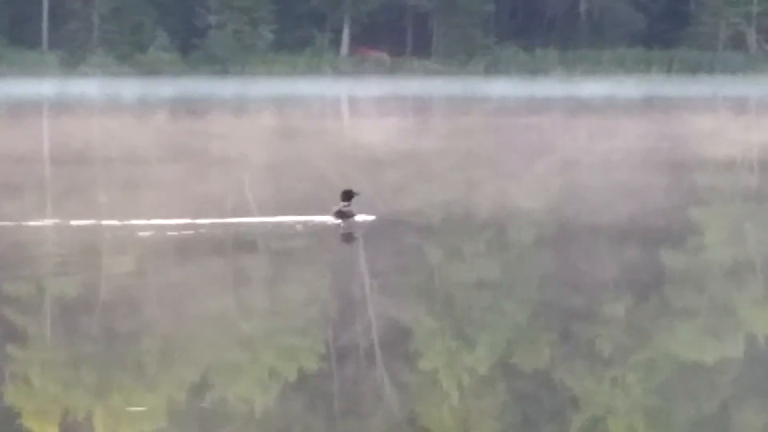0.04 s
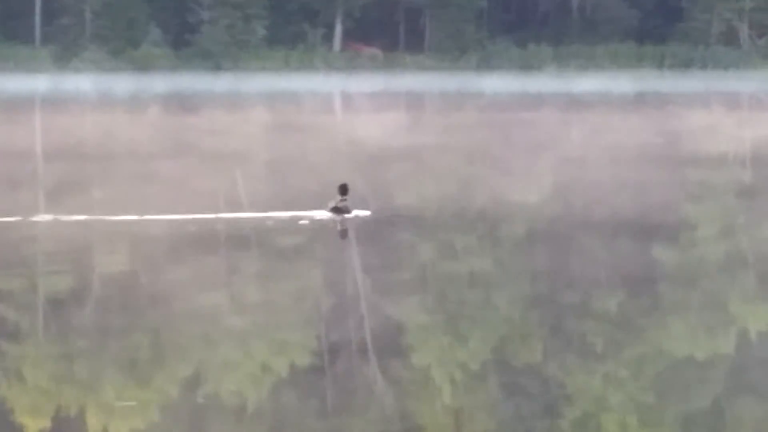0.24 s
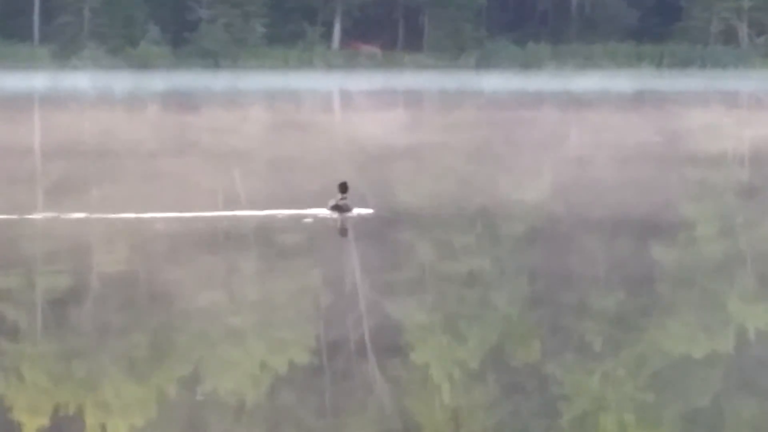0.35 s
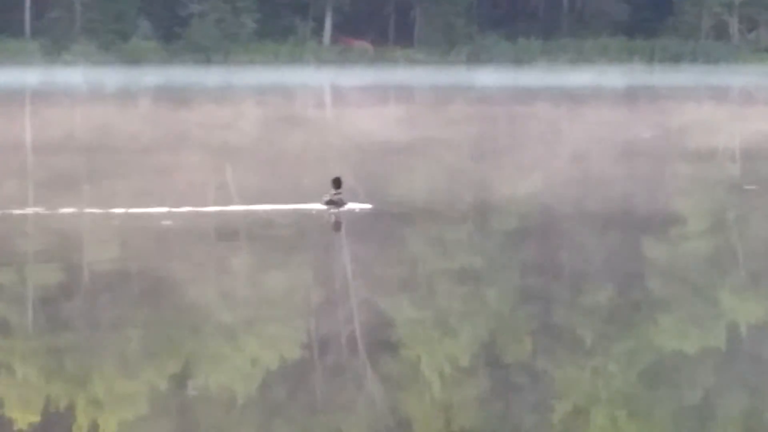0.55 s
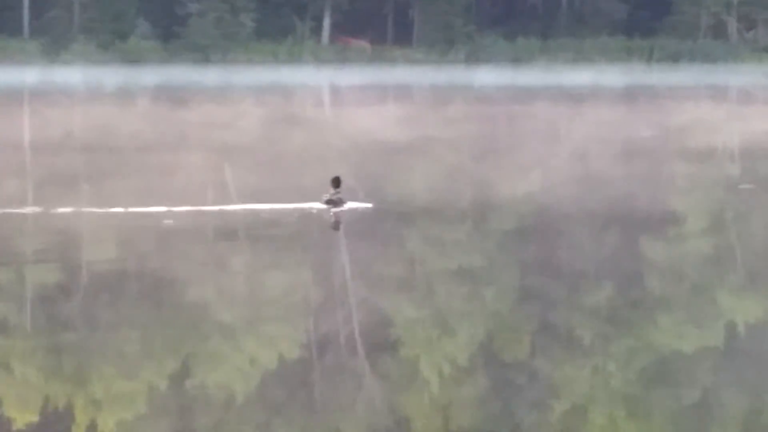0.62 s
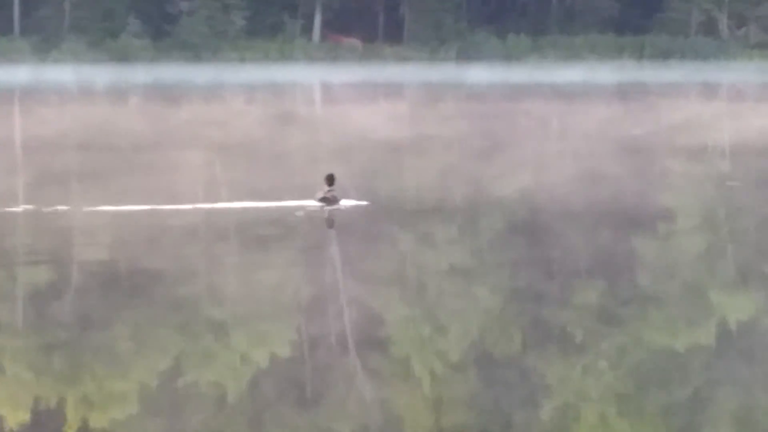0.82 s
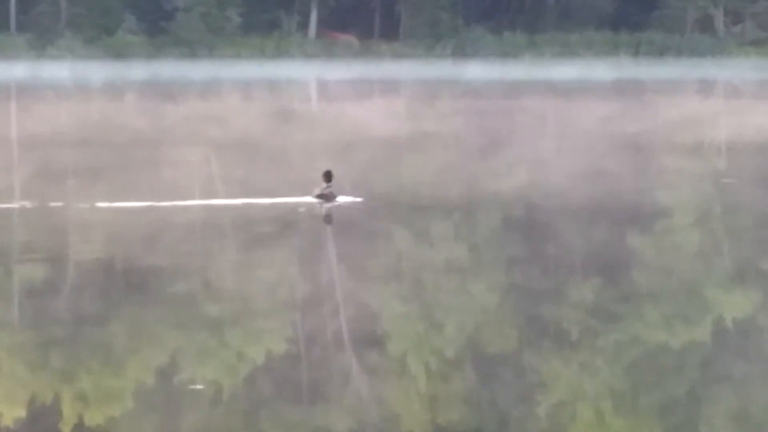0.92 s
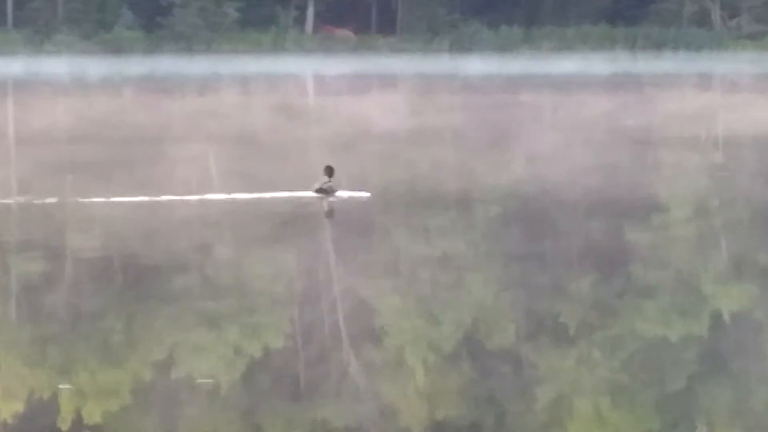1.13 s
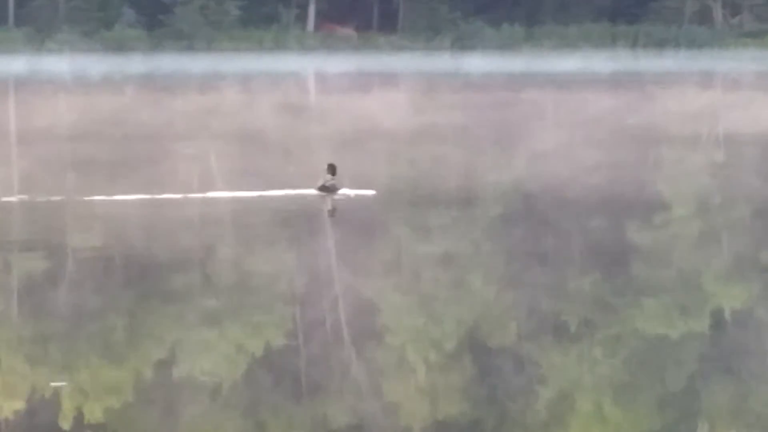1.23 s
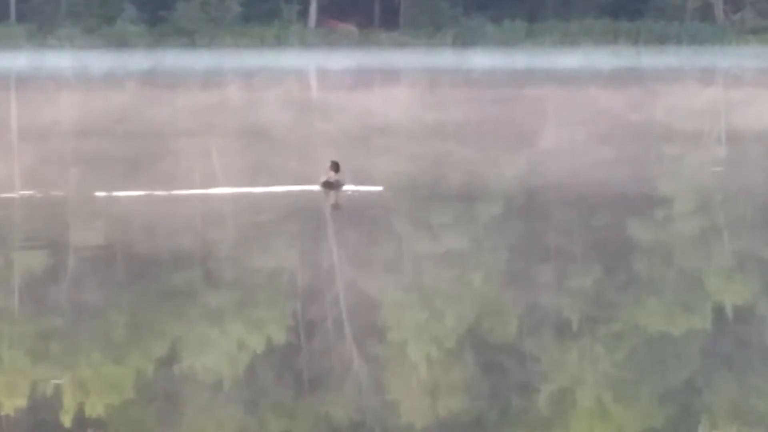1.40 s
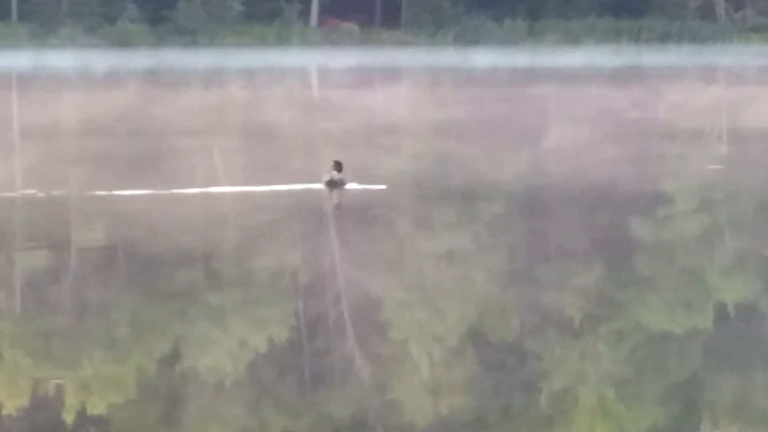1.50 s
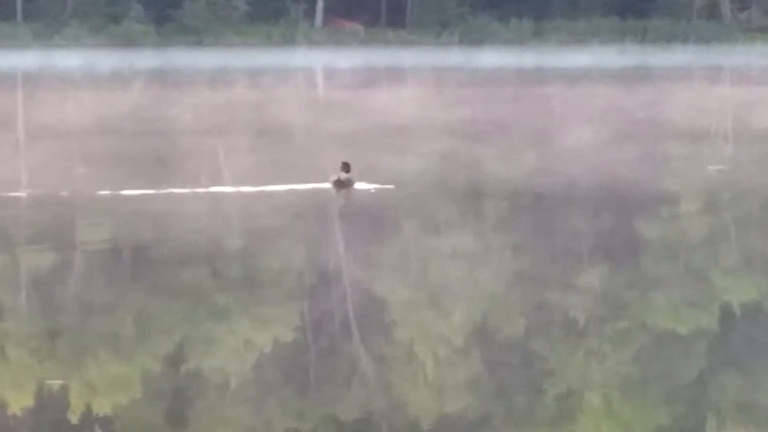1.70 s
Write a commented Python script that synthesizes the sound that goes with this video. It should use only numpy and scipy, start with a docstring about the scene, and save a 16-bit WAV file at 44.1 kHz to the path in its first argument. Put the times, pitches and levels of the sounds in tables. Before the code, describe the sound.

A loon gives one long wailing call across a calm lake, with faint echoes.

```python
"""A soft, rising yelp opens the single call of a loon, far out on a calm lake.
The bird's voice breaks upward into a clear note, jumps again to a long, sinking wail
and drops to a short, low hoot as its breath runs out. The wooded shore rings with the call
and sends late echoes back over a faint outdoor hush and a low rumble of air.
A high hiss flickers, and a soft noise follows the loudness of the call."""
import sys
import numpy as np
from scipy import signal
from scipy.fft import rfft, irfft
from scipy.io import wavfile
from scipy.ndimage import uniform_filter1d

SR = 44100
rng = np.random.default_rng(int(sys.argv[2]) if len(sys.argv) > 2 else 0)


def unload_wav(signal):
    """Save mono or channel-first audio to the path in sys.argv[1] as 16-bit WAV at rate SR, clipped to [-1, 1]."""
    wavfile.write(
        sys.argv[1],
        SR,
        np.round(np.clip(np.atleast_2d(signal).T, -1, 1) * 32767).astype(np.int16),
    )


N = 77175

# The four notes of the call (time [s], pitch [Hz], level [dB]); the yelp's level is reshaped later.
YELP_PATH = [(0.152, 452, -48), (.172, 514.7, -40.5), (0.201, 554, -35), (0.228, 636, -42)]
CLEAR_PATH = [(.231, 797.5, -28.5), (.26, 811, -24.5), (.32, 827, -25), (.342, 846.4, -19),
              (.356, 833, -20.5), (.374, 849.6, -16), (.389, 855.7, -19.5), (.407, 893, -22)]
WAIL_PATH = [(.411, 1049, -22), (.49, 1047, -21.5), (.55, 1043, -21), (.605, 1041, -25.5),
             (.66, 1038, -24.5), (.70, 1037, -19), (.735, 1034, -17.3), (.778, 1029, -22.7),
             (.822, 1028, -17.6), (.85, 1020, -27), (.895, 1021, -21.3), (.935, 1017, -21.3),
             (.958, 1012, -25.5), (.985, 1010, -22.3), (1.06, 1000, -29.5), (1.16, 989, -30.5),
             (1.3, 964, -34), (1.39, 954, -36), (1.438, 943, -38)]
HOOT_PATH = [(1.441, 738, -44), (1.453, 726.5, -32.5), (1.479, 713, -51.5)]
# Tones stacked in a note, called harmonics (multiple of the pitch, base level within the note [dB])
YELP_HARMONICS = [(1, 8), (2, 0), (3, -6.5)]
CLEAR_HARMONICS = [(2, -24.5), (3, -50.5), (4, -42.5), (5, -51.5), (6, -54), (7, -56), (11, -67.5)]
# The wail's harmonics against its lowest tone (multiple, start [dB], end [dB], time to settle [s])
WAIL_HARMONICS = [(2, -37, -45, 0.71), (3, -46.5, -34, 0.73), (4, -54.5, -52, .5), (5, -43.5, -58.5, 0.3),
                  (9, -56, -71.5, 0.36), (10, -57, -67, .5)]
# Echoes from the shore (delay [s], fade time [s], level before dulling [dB])
SHORE_ECHOES = [(.84, .16, -28), (1.36, .15, -33)]
# Tone colour of each background noise (frequency [Hz], relative level [dB])
HUSH_COLOUR = [(25, -10), (60, -5), (170, -4.5), (400, -6), (1000, -6), (2000, -7.5), (4000, -10.5),
               (6300, -16), (8000, -24), (12000, -26.5), (16000, -27.5)]
FOLLOWING_COLOUR = [(30, -17.5), (200, -12.5), (700, -3.5), (1400, -8), (2800, -11), (5000, -23),
                    (9000, -43.5), (16000, -40)]
RUMBLE_COLOUR = [(25, -16.5), (50, -8), (110, 1.5), (220, 1.5), (400, -2.5), (700, -6), (1500, -23),
                 (4000, -46.5)]
# How the rumble swells and fades (time [s], level [dB])
RUMBLE_SWELL = [(.12, -70), (.2, -63), (.45, -59), (.62, -66.5), (.72, -56.5), (.84, -56), (1.03, -58.5),
                (1.11, -66.5), (1.36, -68), (1.7, -72)]

BREAK_S, SOFT_BREAK_S = 0.0073, 0.019  # time to change notes; the last change is softer
THROAT_HZ, THROAT_WIDTH_HZ = 990, 100
NEAR_RING_S, FAR_RING_S = 0.5, 1.9  # time to fade by 60 dB
HUSH_DB, FOLLOWING_DB = -61.5, -37.5  # the following noise is relative to the voice
TIME = np.arange(N) / SR


def yelp():
    """The husky opening slide: its second harmonic sweeps through the pitch where the throat rings."""
    pitch, phase, volume = note(YELP_PATH, BREAK_S, BREAK_S)
    phase += 0.091 * wobble(500)  # a fast shake sounds husky
    firming_db = np.interp(TIME, [YELP_PATH[0][0], YELP_PATH[-1][0]], [0, 14])
    tone = np.zeros(N)
    for multiple, db in YELP_HARMONICS:
        hz = multiple * pitch
        throat = 1 / np.hypot(1, (hz / THROAT_HZ - THROAT_HZ / hz) * THROAT_HZ / THROAT_WIDTH_HZ)
        strength = gain(db + (multiple == 1) * firming_db)  # only the lowest tone firms up
        tone += strength * throat * np.sin(multiple * phase)
    return volume * tone


def clear_note():
    """The voice breaks into a rising note that grows purer as it swells."""
    _, phase, volume = note(CLEAR_PATH, BREAK_S, BREAK_S)
    upper_volume = volume.max() * (volume / volume.max()) ** 0.87  # swells less than the lowest tone
    upper = sum(harmonic(phase, multiple, db) for multiple, db in CLEAR_HARMONICS)
    return volume * np.sin(phase) + upper_volume * upper


def wail():
    """The long, sinking top note: its third harmonic grows while most others fade."""
    _, phase, volume = note(WAIL_PATH, BREAK_S, SOFT_BREAK_S)
    age = TIME - WAIL_PATH[0][0]
    tone = np.sin(phase)
    for multiple, start_db, end_db, settle_s in WAIL_HARMONICS:
        tone += harmonic(phase, multiple, np.interp(age, [0, settle_s], [start_db, end_db]))
    return volume * tone


def hoot():
    """The breath runs out in a short, pure tone."""
    _, phase, volume = note(HOOT_PATH, SOFT_BREAK_S, SOFT_BREAK_S)
    return volume * np.sin(phase)


def note(path, fade_in_s, fade_out_s):
    """Pitch, phase (how far the vibration has turned) and volume of one slightly unsteady note."""
    times, hz, db = np.array(path).T
    glide = lambda values: uniform_filter1d(np.interp(TIME, times, values), size=500)
    pitch = glide(hz) * (1 + 0.001 * wobble(64))
    edges = np.minimum((TIME - times[0]) / fade_in_s, (times[-1] - TIME) / fade_out_s)
    fade = np.sin(np.pi / 2 * np.clip(edges + 0.5, 0, 1)) ** 2
    volume = np.sqrt(2) * gain(glide(db) + 0.48 * wobble(60)) * fade
    return pitch, 2 * np.pi * np.cumsum(pitch) / SR, volume


def harmonic(phase, multiple, db):
    """One higher tone of the voice, wavering on its own by about 1 dB."""
    return gain(db + wobble(13)) * np.sin(multiple * phase)


def shore(voice):
    """Trees scatter the call: a short, bright ring nearby, a long, dull one and late echoes from afar."""
    def scatter(delay_s, fade_s, db):
        decay = (TIME >= delay_s) * np.exp(-np.maximum(TIME - delay_s, 0) / fade_s)
        tail = rng.standard_normal(N) * decay
        return gain(db) * tail / np.linalg.norm(tail)
    near = scatter(delay_s=0.02, fade_s=NEAR_RING_S / np.log(1000), db=-15.5)
    far = scatter(delay_s=0.02, fade_s=FAR_RING_S / np.log(1000), db=-22)
    far += sum(scatter(*echo) for echo in SHORE_ECHOES)
    dull = signal.butter(2, 1150, fs=SR, output="sos")
    return signal.fftconvolve(voice, near + signal.sosfilt(dull, far))[:N]


def hush():
    """The faint hush of still air over the lake."""
    rise_db = np.interp(TIME, [0.095, 0.19], [-3, 0])
    return noise(HUSH_COLOUR) * gain(HUSH_DB + rise_db + 1.1 * wobble(5.3))


def rumble():
    """A low rumble of air swells and fades."""
    return noise(RUMBLE_COLOUR) * gain(np.interp(TIME, *np.array(RUMBLE_SWELL).T))


def flicker_hiss(sound):
    """The high hiss, above 7000 Hz, flickers in level."""
    hiss = signal.sosfiltfilt(signal.butter(4, 7000, "high", fs=SR, output="sos"), sound)
    return sound + hiss * (gain(1.35 * wobble(16)) - 1)


def following_noise(voice):
    """A soft noise follows the loudness of the call."""
    loudness = np.sqrt(np.maximum(uniform_filter1d(voice ** 2, size=3000), 0))
    return noise(FOLLOWING_COLOUR) * loudness * gain(FOLLOWING_DB)


def noise(colour):
    """Noise with the given tone colour and a typical size of 1."""
    hz, db = np.array(colour).T
    frequencies = np.maximum(np.arange(N // 2 + 1) * SR / N, 1)
    shape = gain(np.interp(np.log(frequencies), np.log(hz), db))
    sound = irfft(rfft(rng.standard_normal(N)) * shape, N)
    return sound / sound.std()


def wobble(rate_hz):
    """A smooth, random drift with a typical size of 1."""
    width = int(SR / rate_hz)
    drift = uniform_filter1d(uniform_filter1d(rng.standard_normal(N), width), width)
    return drift / drift.std()


def gain(db):
    """Turn decibels into a volume multiplier."""
    return 10 ** (np.asarray(db) / 20)


def scene():
    """The call, its echoes and the background, in one channel."""
    voice = yelp() + clear_note() + wail() + hoot()
    return (voice + shore(voice) + flicker_hiss(hush()) + rumble() + following_noise(voice))[None]


def record(dry):
    """A steep filter cuts the treble above 15750 Hz."""
    return signal.sosfilt(signal.ellip(10, 0.1, 80, 15750, fs=SR, output="sos"), dry)


dry = scene()
out = record(dry)
unload_wav(out)
```